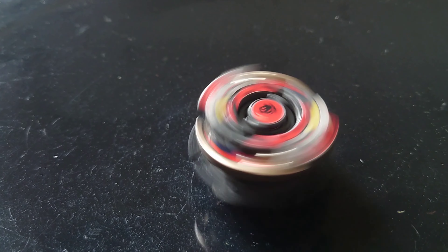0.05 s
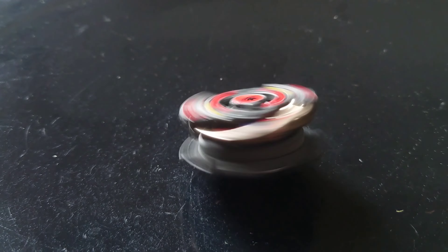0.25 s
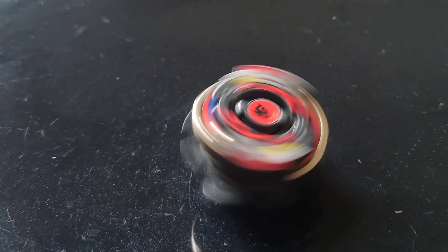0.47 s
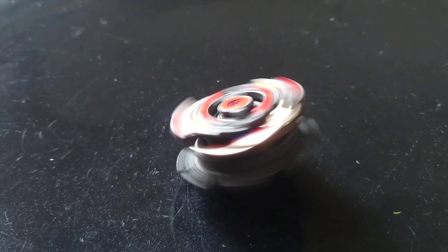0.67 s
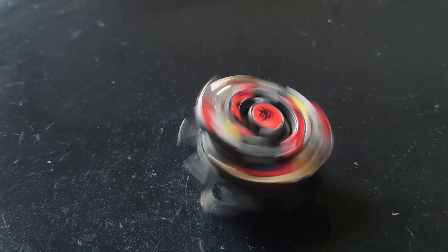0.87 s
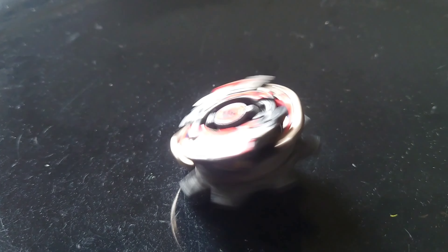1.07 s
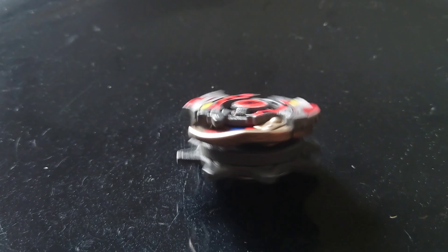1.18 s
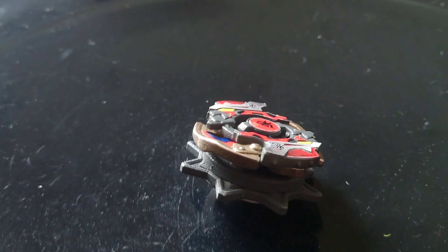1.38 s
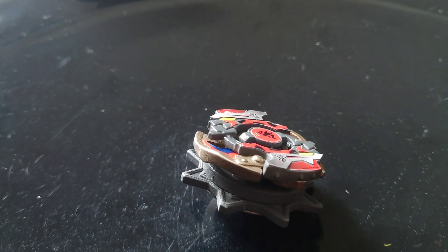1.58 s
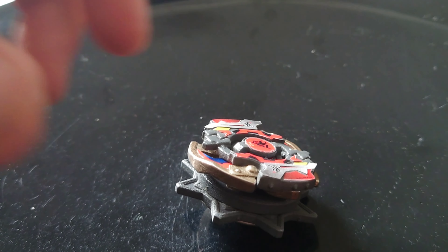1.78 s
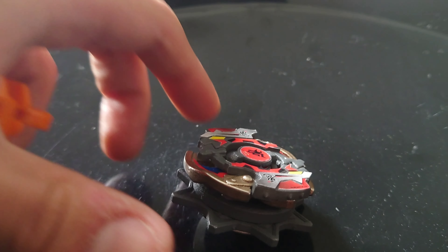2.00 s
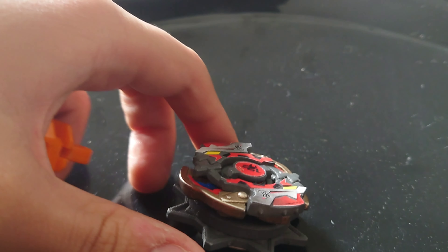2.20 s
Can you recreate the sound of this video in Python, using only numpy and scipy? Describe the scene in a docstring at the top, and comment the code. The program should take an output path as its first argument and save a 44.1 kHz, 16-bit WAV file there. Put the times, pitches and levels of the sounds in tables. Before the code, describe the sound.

A toy top clacks and scrapes as it topples, then rocks with a few faint taps.

```python
"""A spinning top wobbles on a hard board: its rim knocks, ever faster, then scrapes and rattles.
Each impact excites the damped modes of the board (a thump) and of the plastic and metal body (a clack),
and friction at the dragging rim makes the scrape. The toppled top rocks with a few faint taps.
A small room reverberates; fingers click on the camera housing, over quiet background noise."""
import sys
import numpy as np
from scipy import signal
from scipy.fft import rfft, irfft, next_fast_len
from scipy.io import wavfile
from scipy.ndimage import map_coordinates

SR = 44100
rng = np.random.default_rng(int(sys.argv[2]) if len(sys.argv) > 2 else 0)


def file_out(sig):
    """Save sig as 16-bit WAV at sys.argv[1]."""
    # one column per channel
    cols = np.atleast_2d(sig).T
    # limit, then scale
    lim = np.clip(cols, -1, 1)
    pcm = np.round(lim * 32767).astype(np.int16)
    wavfile.write(sys.argv[1], SR, pcm)


N = 99225

# Spectra of the room noise, thin treble noise and hiss. Each row: frequency in Hz, relative density in dB.
FLOOR_LEFT = [(25, 10.5), (60, 0), (95, 9.5), (130, 6), (210, -6), (450, 5), (1200, -1), (2300, -25.5),
              (4000, -30), (8000, -31), (15000, -29)]
FLOOR_RIGHT = [(25, 0.5), (60, -8), (95, 12.5), (130, 2.5), (210, -8), (450, 5.5), (1300, -1), (2300, -4),
               (4000, -26.5), (8000, -38), (15000, -49)]
TREBLE_SPECTRUM = [(800, -1), (2000, 4), (3900, -3), (5800, -8), (7200, -27), (9000, -27), (11800, -19),
                   (16000, -44)]
HISS_SPECTRUM = [(800, -18), (2000, -8), (3900, 3.5), (4700, -10.5), (5800, -4.5), (7200, -23), (9000, -24),
                 (10500, -9.5), (12000, -5), (14000, -11), (16000, -19)]
# Envelopes of the treble noise, hiss and scrape. Each row: time in seconds, level in dB.
TREBLE_LEVEL = [(.2, -80.5), (.35, -73.5), (1.4, -66), (2.25, -72)]
HISS_LEVEL = [(1.55, -104), (1.72, -77.5), (1.85, -75.5), (1.98, -68), (2.1, -72.5), (2.25, -86.5)]
SCRAPE_LEVEL = [(.84, -98), (.875, -50), (.897, -46), (.932, -70), (1.0, -54.5), (1.06, -61), (1.11, -56.5),
                (1.135, -51), (1.165, -57.5), (1.228, -52.5), (1.245, -67), (1.32, -63), (1.4, -109)]
# Reverberation of the room. Each row: frequency in Hz, time to decay by 60 dB (T60) in seconds.
ROOM_DECAY = [(200, 0.42), (1500, 0.15), (5000, 0.24), (12000, 0.16)]
# Finger clicks. Each row: start in seconds, the pop's left and right levels in dB, its pitch in Hz,
# its rise time and T60 in seconds, push and snap levels in dB, ring frequency in Hz.
CLICKS = [(1.4385, -53, -4.5, 763, 0.0013, 0.0038, -30.5, -65, 1930),
          (1.4569, -41, -34, 960, 0.000067, 0.0079, -44, -46, 3930),
          (1.568, -63, -44, 1200, 0.00017, 0.0042, -64, -51, 3800),
          (1.5841, -14.5, -30.5, 710, 0.00018, 0.0025, -42, -44, 5240)]
# Spectra of the scrape, tick and clack. Each row: frequency in Hz, relative density in dB.
SCRAPE_LEFT = [(300, 1.5), (1200, -2), (1900, -2.5), (2700, -38), (3900, -10), (5000, -17), (6200, -23),
               (7500, -21.5), (11000, -19), (15500, -27)]
SCRAPE_RIGHT = [(300, -7), (850, -2), (1400, 6), (2200, 4.5), (2900, -2.5), (3600, -5), (5000, -0.5),
                (6200, -10), (7100, -25), (8800, -19), (11500, -14), (15500, -27)]
TICK_LEFT = [(1000, -57), (2800, -21), (3800, -8.5), (5000, -13), (6000, -21.5), (7500, -25), (11000, -23),
             (15500, -30)]
TICK_RIGHT = [(1000, -69), (2200, -11), (3500, 3), (4300, -2.5), (5000, -2.5), (6200, -6), (7000, -22.5),
              (8800, -26.5), (11500, -19.5), (15500, -34)]
CLACK_LEFT = [(150, -46), (260, -5), (400, -18), (600, -6), (800, -9), (1100, -5), (1550, -15), (1900, -21),
              (2500, -42.5), (4000, -32), (8000, -46.5)]
CLACK_RIGHT = [(150, 1), (260, -28), (400, -0.5), (600, -10), (850, -8), (1100, -4), (1400, -1.5),
               (1850, -3), (2400, -7.5), (2900, -14), (4000, -20), (8000, -82)]
# Modes of the board, the hollow knock and the top's body.
# Each row: frequency in Hz, relative level in dB, T60 in seconds.
BOARD_MODES = [(78.5, 2.5, 0.18), (98.55, -0.5, 0.14), (119.9, 1, 0.13), (158.3, 3, 0.084),
               (183.6, -27, 0.66), (242.4, -0.5, 0.04), (355, -12, 0.092), (424, -25, 0.4)]
HOLLOW_MODES = [(288, -1.5, 0.025), (372.7, 2.5, 0.045), (459.4, -4, 0.052), (540, -2.5, 0.015)]
BODY_MODES = [(1043.2, -9.5, 0.098), (1341, -3, 0.034), (1510, -1, 0.022), (1834, -6.5, 0.048),
              (2185, -12, 0.036), (2441, -6, 0.038), (3330, -6, 0.034), (3694, -2, 0.033)]
# Impacts of the rim. Each row: start in seconds, relative levels of thump, hollow knock and clack in dB,
# clack pitch in Hz, relative tick level in dB.
KNOCKS = [(0.2405, -39.5, -42, -30.5, 1764, -55), (0.247, -88, -47.5, -42, 1760, -45),
          (0.356, -32, -43, -33, 1356, -45), (0.4283, -41.5, -48, -40, 1437, -50),
          (0.4392, -30, -50, -31, 1604, -42.5), (0.504, -33.5, -35, -30.5, 1384, -42.5),
          (0.5979, -32.5, -47, -33, 1676, -43), (0.648, -41.5, -53, -47, 1900, -49.5),
          (0.6596, -28.5, -23.5, -25.5, 1823, -40), (0.7021, -37.5, -37, -34.5, 1315, -40.5),
          (0.7095, -77, -37, -62, 1400, -52), (0.7339, -32.5, -41, -38, 1387, -39.5),
          (0.7717, -33.5, -40, -33.5, 1360, -40), (0.7792, -61, -40, -50, 1300, -58),
          (0.8096, -34, -45, -35, 1467, -43), (0.8503, -33, -33, -33, 1714, -43),
          (0.862, -37, -43, -45, 1310, -46.5), (0.88, -45.5, -60, -64, 1610, -55),
          (0.9029, -31, -42, -33, 1340, -40), (0.947, -42, -73, -49, 1530, -39.5),
          (0.9612, -29, -48, -29, 1500, -44.5), (0.993, -41, -60, -45, 1590, -45),
          (1.0107, -27, -44.5, -27.5, 1955, -36), (1.0316, -36, -46, -37, 1690, -53),
          (1.0567, -43, -47, -39, 1310, -51), (1.0708, -30.5, -70, -30.5, 1830, -39.5),
          (1.0902, -46, -41.5, -43.5, 1720, -59), (1.1075, -49, -58, -40.5, 1870, -50),
          (1.1463, -62, -70, -43.5, 2250, -43), (1.1866, -37, -43, -39, 1110, -42.5),
          (1.205, -66, -55, -49, 1410, -48), (1.3305, -42.5, -50, -41, 1605, -52),
          (1.4645, -44, -43.5, -42, 1140, -48), (1.5501, -49.5, -44, -43.5, 1365, -59),
          (1.609, -50, -49, -45.5, 1570, -57.5), (1.6645, -58.5, -51, -47.5, 1310, -59.5),
          (1.7108, -52.5, -54, -46, 1410, -56.5), (1.741, -54.5, -61.5, -52, 1190, -63),
          (1.7759, -67, -60, -54, 1240, -65), (1.8023, -59, -55, -51, 1300, -66),
          (1.835, -52.5, -54, -50, 1250, -63.5), (2.15, -74, -55, -54.5, 1600, -68)]

TOPPLED_S, ROCK_HZ, ROCK_RISE_S = 1.3, 77.4, 0.0033
CLACK_RISE_S, TICK_RISE_S = 0.0012, 0.00065
GRAINS_PER_S, SLIPS_PER_S = 320, 170
PUSH_HZ, OVERTONE_RATIO = 180, 1.86
THUMP_CUTOFF_HZ, BAND_LIMIT_HZ = 47.7, 16000


def amp(db):
    return 10 ** (np.asarray(db) / 20)


def unit_rms(x):
    return x / np.sqrt(np.mean(x ** 2) + 1e-20)


def sine(t, hz):
    return np.sin(2 * np.pi * hz * t)


def along(points, hz):
    """Interpolation of (frequency, value) points on a logarithmic frequency axis."""
    freqs, values = np.transpose(points)
    return np.interp(np.log(hz + 1), np.log(freqs + 1), values)


def envelope(rows):
    """Amplitude per sample, interpolated linearly in decibels."""
    return amp(np.interp(np.arange(N) / SR, *np.transpose(rows)))


def rise(t, seconds):
    """First-order growth with the given time constant."""
    return 1 - np.exp(-t / seconds)


def fade(t, t60):
    """Exponential decay by 60 dB in t60 seconds."""
    return np.exp(-np.log(1000) * t / t60)


def add(track, start, sound):
    """Superposition of a sound on the track, from start in seconds."""
    part = track[..., int(start * SR):][..., :sound.shape[-1]]
    part += sound[..., :part.shape[-1]]


def colour(x, *spectra):
    """Minimum-phase filters, one per channel; the strongest preserves the power of white noise."""
    size = 2 * next_fast_len(N // 2 + SR // 4)
    gain = np.array([amp(along(points, np.fft.rfftfreq(size, 1 / SR))) for points in spectra])
    gain /= np.sqrt(np.mean(gain ** 2, axis=1).max())
    cepstrum = irfft(np.log(gain), size) * (1 + np.sign(np.fft.fftfreq(size)))
    return irfft(rfft(x, size) * np.exp(rfft(cepstrum)), size)[:, :N]


def noise_pair(size, correlation):
    """Partially coherent white noise in two channels, as a sum of mid and side signals."""
    mid, side = rng.standard_normal((2, size))
    angle = np.arccos(correlation) / 2
    return np.cos(angle) * mid + np.sin(angle) * np.array([side, -side])


def ringing(modes, t):
    """Free vibration: a sum of damped modes whose levels and phases vary from strike to strike."""
    hz, db, t60 = np.transpose(modes)[:, :, None]
    spread, phase = rng.standard_normal((2, len(modes), 1))
    return (amp(db + 0.88 * spread) * fade(t, t60) * np.sin(2 * np.pi * (hz * t + phase))).sum(0)


def background():
    """Filtered noise: a steady room floor, thin treble, and a hiss that swells as the hand nears."""
    floor = np.vstack([colour(rng.standard_normal(N), side) for side in (FLOOR_LEFT, FLOOR_RIGHT)])
    treble = envelope(TREBLE_LEVEL) * colour(rng.standard_normal((2, N)), TREBLE_SPECTRUM)
    hiss = envelope(HISS_LEVEL) * colour(rng.standard_normal((2, N)), HISS_SPECTRUM)
    return amp(-70) * floor + amp([[-19], [0]]) * (treble + hiss)


def room(x):
    """Diffuse reverberation: each tenth of the sound is convolved with its own decaying noise."""
    reverb = np.zeros((2, N))
    for piece in np.array_split(np.arange(N), 10):
        hz, t, noise = signal.stft(rng.standard_normal((2, SR // 2)), SR, nperseg=256)
        decay = fade(t, along(ROOM_DECAY, hz)[:, None])
        tail = signal.istft(noise * decay * rise(t, 0.0017), SR, nperseg=256)[1]
        tail /= np.linalg.norm(tail[0])
        add(reverb, piece[0] / SR, signal.fftconvolve(x[:, piece], tail, axes=1))
    return reverb


def housing_clicks():
    """Finger impacts excite damped transients in the housing: a pop, low push, high ring and snap."""
    t, tones, snaps = np.arange(SR // 10) / SR, np.zeros((2, N)), np.zeros((2, N))
    push = amp([[-40], [0]]) * fade(t, t60=0.022) * sine(t, PUSH_HZ)
    for start, left_db, right_db, hz, rise_s, t60, push_db, snap_db, ring_hz in CLICKS:
        partials = sine(t, hz) + amp(-13) * sine(t, OVERTONE_RATIO * hz)
        pop = amp([[left_db], [right_db]]) * rise(t, rise_s) * fade(t, t60) * partials
        ring = amp(snap_db - 3) * fade(t, t60=0.016) * sine(t, ring_hz)
        add(tones, start, pop + amp(push_db) * push + ring)
        add(snaps, start, amp(snap_db) * fade(t, t60=0.015) * noise_pair(len(t), correlation=0.19))
    return tones + colour(snaps, SCRAPE_LEFT, TICK_RIGHT)


def rim_scrape():
    """Stick-slip friction: fine grains and separate slips modulate the noise of the dragging rim."""
    t = np.arange(SR // 50) / SR
    roughness = map_coordinates(rng.standard_normal(N), [np.arange(N) * GRAINS_PER_S / SR], order=1)
    grain = amp(3.5 * roughness)
    catches = (rng.random(N) < SLIPS_PER_S / SR) * amp(2 * rng.standard_normal(N))
    slips = signal.fftconvolve(catches, fade(t, t60=0.0088))[:N]
    friction = (unit_rms(grain) + amp(-4) * unit_rms(slips)) * noise_pair(N, correlation=0.79)
    return colour(unit_rms(friction) * envelope(SCRAPE_LEVEL), SCRAPE_LEFT, SCRAPE_RIGHT)


def board_thumps():
    """Impulse response: each knock pushes the board down and rings its modes; once toppled, the top rocks."""
    t, track = np.arange(SR // 3) / SR, np.zeros(N)
    ring = sum(amp(db) * fade(t, t60) * sine(t, hz) for hz, db, t60 in BOARD_MODES)
    rock = amp(11.5) * rise(t, ROCK_RISE_S) * fade(t, t60=0.17) * sine(t, ROCK_HZ)
    for start, thump_db, *_ in KNOCKS:
        add(track, start, -amp(thump_db - 3) * (ring + rock * (start > TOPPLED_S)))
    highpass = signal.butter(4, THUMP_CUTOFF_HZ, btype='high', fs=SR, output='sos')
    return amp([[0], [-4.5]]) * signal.sosfilt(highpass, track)


def hollow_knocks():
    """Heavily damped midrange modes give each knock its hollow sound."""
    t, track = np.arange(SR // 6) / SR, np.zeros(N)
    for start, _, hollow_db, *_ in KNOCKS:
        add(track, start, amp(hollow_db) * rise(t, CLACK_RISE_S) * ringing(HOLLOW_MODES, t))
    return amp([[0], [-6.5]]) * track


def top_clacks():
    """Impact excitation: dense noise, body modes, a pitch set by the contact point and a bright tick."""
    t, clacks, ticks = np.arange(SR // 6) / SR, np.zeros((2, N)), np.zeros((2, N))
    crack = amp(-2.5) * fade(t, t60=0.0072)
    tick_shape = rise(t, TICK_RISE_S) * (crack + fade(t, t60=0.033))
    for start, _, _, clack_db, hz, tick_db in KNOCKS:
        body = amp(-7.5) * ringing(BODY_MODES, t) / 2
        contact = amp(-10.5) * fade(t, t60=0.026) * sine(t, hz)
        dense = noise_pair(len(t), correlation=0.73) * fade(t, t60=0.036)
        add(clacks, start, amp(clack_db) * rise(t, CLACK_RISE_S) * (dense + body + contact))
        add(ticks, start, amp(tick_db + 0.5) * tick_shape * noise_pair(len(t), correlation=0.19))
    return colour(clacks, CLACK_LEFT, CLACK_RIGHT) + colour(ticks, TICK_LEFT, TICK_RIGHT)


def scene():
    """Superposition of the direct sound, its reverberation, the dry clicks and the background."""
    low = board_thumps() + hollow_knocks()
    top = top_clacks() + rim_scrape()
    reverb = room(amp(-9.5) * top + amp(-16) * low)
    return low + top + reverb + housing_clicks() + background()


def record(dry):
    """An ideal low-pass filter removes everything above the band limit."""
    size = next_fast_len(N + SR // 2)
    passband = np.fft.rfftfreq(size, 1 / SR) < BAND_LIMIT_HZ
    return irfft(rfft(dry, size) * passband, size)[:, :N]


dry = scene()
out = record(dry)
file_out(out)
```